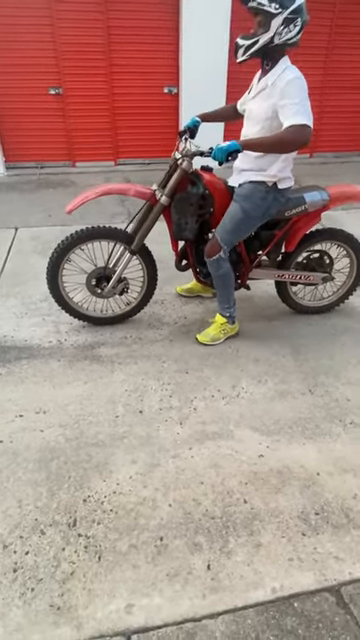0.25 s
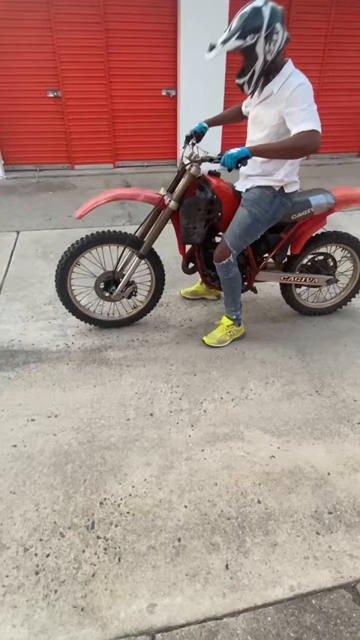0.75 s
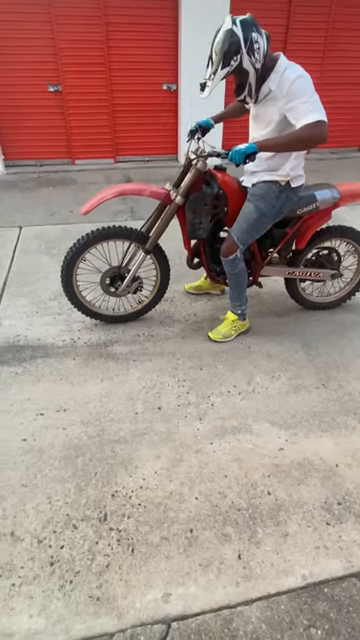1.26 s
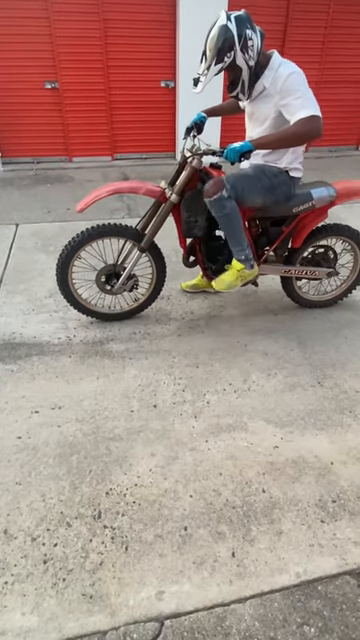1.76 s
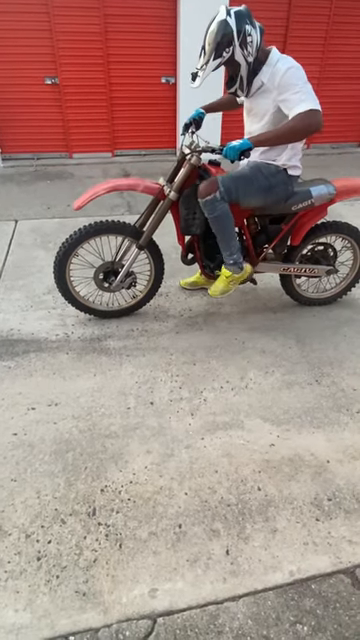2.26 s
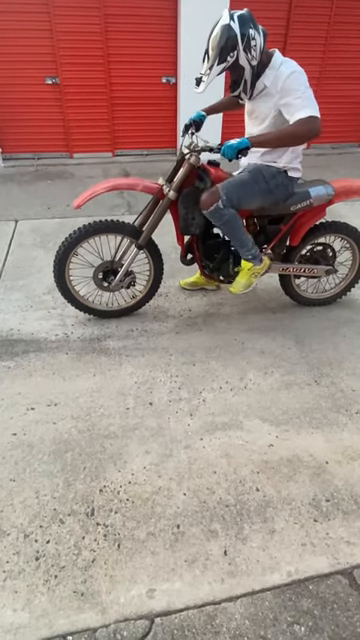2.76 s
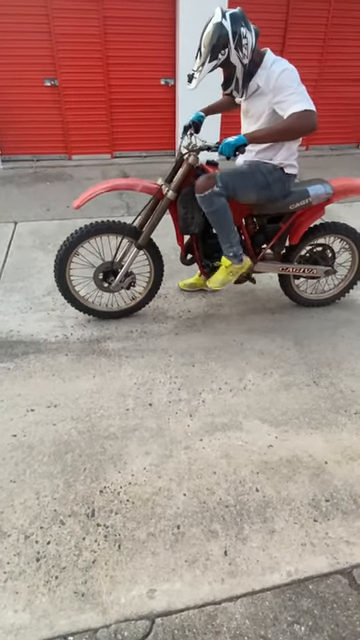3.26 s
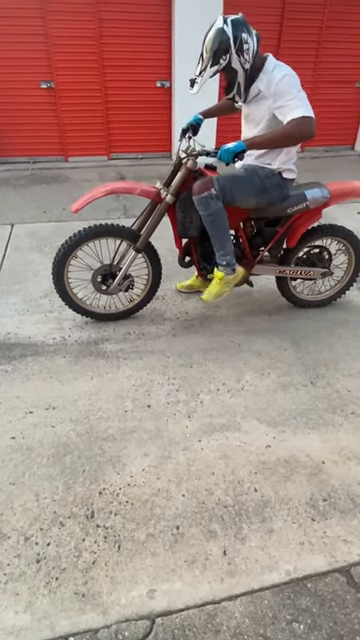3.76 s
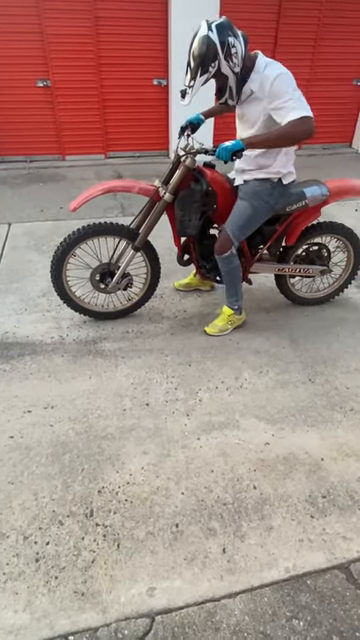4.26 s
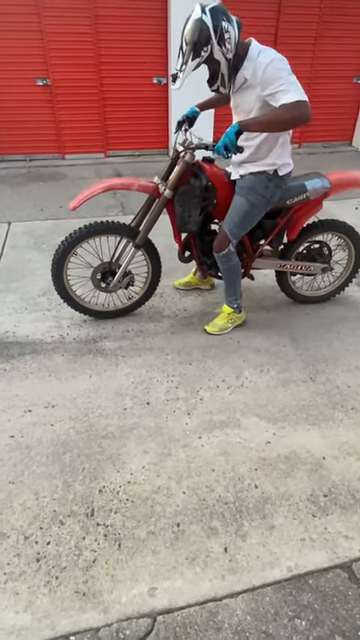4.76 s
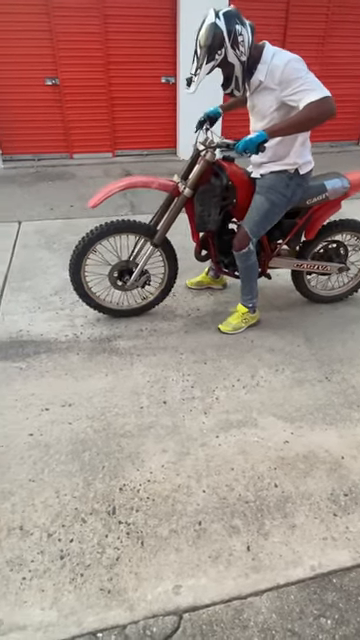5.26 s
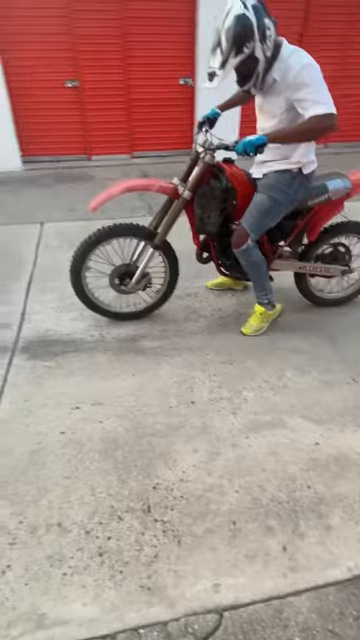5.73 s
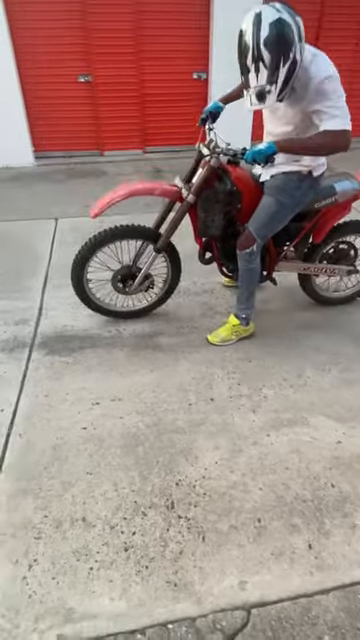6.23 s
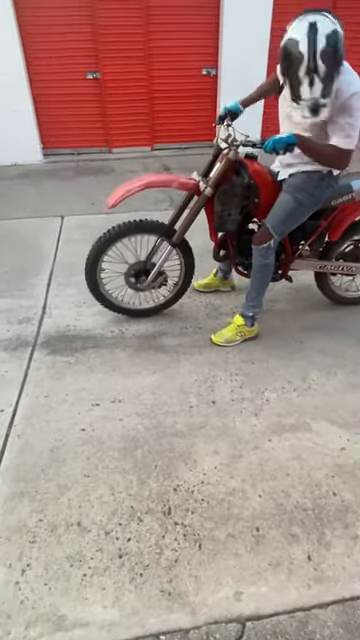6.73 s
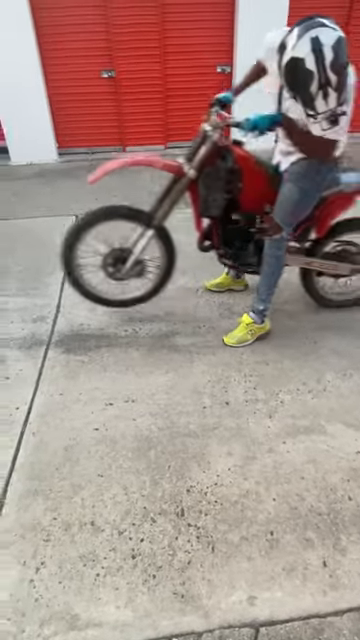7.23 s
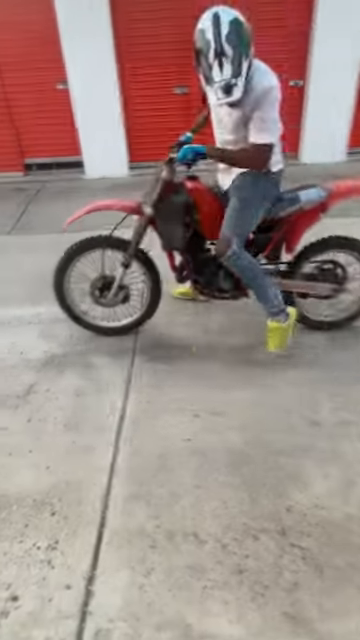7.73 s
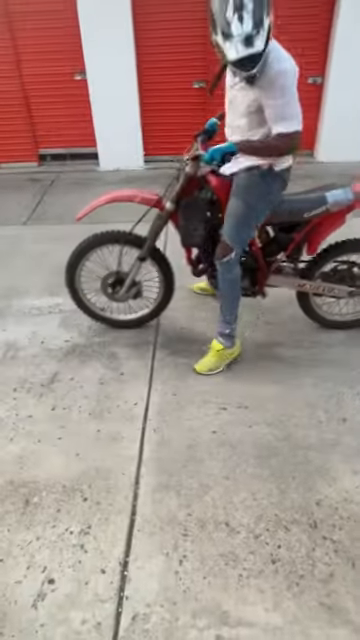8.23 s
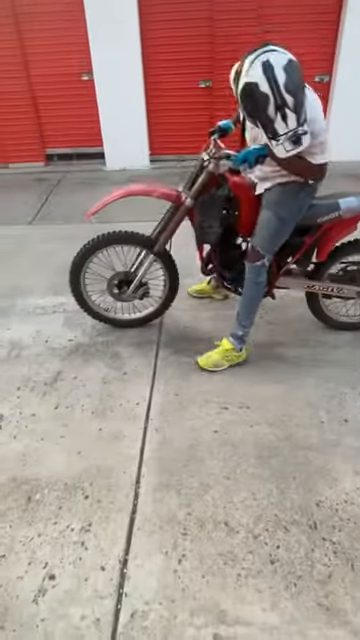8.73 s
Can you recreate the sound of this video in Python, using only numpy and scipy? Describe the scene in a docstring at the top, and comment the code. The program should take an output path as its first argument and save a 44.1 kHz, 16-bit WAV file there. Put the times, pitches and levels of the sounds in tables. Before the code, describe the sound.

Close outdoor stereo sound of a single-cylinder two-stroke bike, never stopping. A loud blip opens, followed by rough double revs, then isolated blips with slowly sagging revs between them. Small stray firings crackle midway. Later the twists come quickly, including a sustained rev pulled down by the clutch, slack chain rattling, and loud final barks. Hard walls return tight slap echoes; faint low rumble lies underneath.

```python
"""Two-stroke dirt bike, blipped in a yard

A dirt bike stands on a concrete lot before steel shutter doors; its throttle is twisted again and again.
Each blip races the crank and sounds the airbox resonances with hard pulses, one a turn.
The crank then coasts down: a sine thumps at crank rate, light pulses ring the pipe, metal rattles once
a turn; rasp and hiss flow nearly steadily, their strength varying from turn to turn.
Stray firings bark, chain clatter comes in bursts of ringing noise, and a low rumble has short thuds."""
import sys
import numpy as np
from scipy import signal
from scipy.fft import rfft, irfft, next_fast_len
from scipy.io import wavfile
from scipy.ndimage import uniform_filter1d

SR = 44100
rng = np.random.default_rng(int(sys.argv[2]) if len(sys.argv) > 2 else 0)


def materialize(psi):
    """Save the field psi as 16-bit PCM at rate SR to the path in sys.argv[1].

    A 1-D psi becomes a single channel; in a 2-D psi each row is a channel.
    """
    bounded = np.clip(np.atleast_2d(psi).T, -1, 1)
    quanta = np.round(bounded * 32767).astype(np.int16)
    wavfile.write(sys.argv[1], SR, quanta)


N = 396459
TIME = np.arange(N) / SR

# Level of the low rumble: start_s, level_db
RUMBLE_LEVEL = [(0.3, -56), (0.5, -51), (2, -52), (3.3, -58), (4.2, -58), (5, -57), (6.1, -61), (7.5, -52),
                (9, -61)]
# Short soft low thuds, most under the loud blips: start_s, length_s, level_db
THUDS = [(0.412, .08, -50), (1.25, .03, -47), (2.548, .04, -45), (5.18, .05, -44), (6.85, .11, -44),
         (7.021, .03, -47), (8.07, .04, -47)]
# Rumble spectrum, relative: freq_hz, density_db_per_hz
RUMBLE_SPECTRUM = [(20, -30), (50, -1), (80, 7.5), (130, 1.5), (400, -15), (2000, -60)]
# Share of noise power common to left and right, by frequency: freq_hz, share_0_to_1
COMMON_SHARE = [(100, 0.88), (1000, 0.61), (2500, 0.56), (3900, 0.32), (5900, 0.44), (6900, 1), (14000, 1)]

# Echoes off doors and walls: delay_s, level_db, left_minus_right_db
ECHOES = [(.021, -13.5, -0.5), (.034, -12, 3.5), (0.063, -13.5, 2.5)]
# Phase difference between left and right, by frequency; sets the stereo width: freq_hz, right_lead_rad
STEREO_PHASE = [(0, 0), (220, 0), (470, 1), (620, 0.8), (850, 1.5), (1050, 0.9), (1240, 1.7), (1420, 0.1),
                (1620, 0.4), (1900, -0.7), (2200, 0.2), (2450, 0.2), (3400, 3.2), (4050, 5.3), (4550, 3.9),
                (5300, 5.95), (5900, 5.3), (6600, 3.2), (8100, 3.1), (9600, 0), (11400, 0), (12500, -3.1),
                (14500, -3.3), (15600, -6.3)]

# Bursts of chain clatter: start_s, length_s, pitch_hz, level_db
CLATTERS = [(7.441, .08, 1117, -30.5), (7.73, 0.039, 1054, -35), (7.801, 0.048, 869, -31),
            (8.0, .05, 800, -21)]
CLATTER_WIDTH_HZ = 95

# Gas noise against crank speed, relative: crank_hz, rasp_db, hiss_db
GAS_BY_SPEED = [(93.7, -43.5, -57), (122, -37, -48.5), (144, -33.5, -45), (190, -32, -42.5)]
# Relative spectra: freq_hz, density_db_per_hz
RASP_SPECTRUM = [(90, -21.5), (220, -5), (400, -4.5), (620, -2.5), (1080, -0.5), (1300, -3), (1550, -2.5),
                 (2250, -4.5), (2750, -3), (3300, -6), (4000, -7), (5000, -8.5), (9000, -68), (16000, -81)]
HISS_SPECTRUM = [(1000, -10), (3000, 21), (4500, 23.5), (6200, 24), (8000, 21), (9500, 18.5), (12000, 16),
                 (14000, 12.5), (16000, -2)]
# Resonances of the pipe's steel shell, relative: freq_hz, width_hz, level_db, left_minus_right_db
SHELL_MODES = [(700, 166, 8, -1.5), (903, 97, 12.5, -2.5), (1105, 134, 10, -3.5), (1325, 117, 6.5, -3),
               (1506, 126, 6, -6), (1730, 80, 5.5, -4), (1980, 79, 2, 5), (2840, 240, 2, -3.5)]
# Resonances of the engine's small metal parts, relative: freq_hz, width_hz, level_db, left_minus_right_db
METAL_MODES = [(2629, 34, 2, -1), (4530, 84, 1, -1.6), (5470, 120, -5.5, -1.1), (6380, 130, -7.5, -0.84),
               (8650, 113, -5.5, 0.2)]
BUZZ_DB = 2.0  # shell ring over the rasp level
CRACKLE_PER_S, CRACKLE_DB = 90, -7  # pops in the pipe; spread of their height relative to a firing
BLAST_POWER, BLAST_LINGER_S = 0.88, 0.0044  # exponent on crank speed; hold beyond the throttle's
FIRE_LAG_S, FIRE_RISE_S, FIRE_FADE_S = 0.017, 0.0091, 0.043  # gas blast follows the throttle
RASP_OVER_HISS_DB, STRAY_HISS_DB = 2.5, -29.5  # in the blast; of stray firings, relative

# Airbox resonances, relative: freq_hz, width_hz, level_db, left_minus_right_db
AIRBOX_MODES = [(139.3, 80, -1, 2), (188, 34, 8.5, 4.7), (347, 60.5, 12.5, 7.3), (449, 99, 9, 4.4),
                (664, 103, 1, 1.5), (833, 210, -11.5, 1.8), (1110, 170, -18, 8)]
# Open airbox, louder where harmonics meet resonances: crank_hz, boom_change_db, bark_change_db
INTAKE_BY_SPEED = [(92, -1, -2.5), (123.5, -1.5, -2.5), (147, -3.5, 4), (146.2, -3, -2), (168.7, 2.5, 1)]
OPEN_S, SHUT_S = 0.064, 0.023  # intake swell; decay once the throttle shuts
HONK_LEAD_S = 0.015  # airbox honks before the engine picks up

# Pipe resonances, relative: freq_hz, width_hz, level_db, left_minus_right_db
PIPE_MODES = [(196, 100, 4, 6.5), (228.6, 42, 8.5, 7.5), (321, 58, 5, 9), (522, 117, 7.5, 2),
              (622, 123, 8.5, 1.5), (794, 41, 1, 8), (900, 36, -4.5, 3)]
# Shut engine, louder where harmonics meet pipe resonances: crank_hz, thump_db, boom_db, bark_db
COAST_BY_SPEED = [(89.9, -65, -39, -31.5), (97.9, -48.5, -31, -34.5), (110, -47, -34, -31),
                  (113.5, -41, -33.5, -31.5), (121.2, -39.5, -31.5, -30), (129.2, -30, -32, -30),
                  (144.2, -31, -28, -30.5), (162, -30, -18, -25.5), (167, -28, -20.5, -27)]
# Level changes over time, some slow, some abrupt: start_s, thump_db, boom_db, bark_db, gas_db
LEVELS = [(0.25, 0, -1, 1, 1), (0.42, 0.5, -0.5, 0.5, -1), (0.6, -3.5, -3, 1, -2), (0.82, 0, -1, 0.5, 0.5),
          (1.2, -2.5, 3, 3, 1), (1.36, 7, -2, 3.5, 1), (1.47, -11, 2.5, 1.5, 1.5),
          (1.62, -3, 1.5, 2.5, 0.5), (1.83, 1, 3, 3.5, 1.5), (1.9, -4, -6.5, -4.5, -1),
          (2.04, -1, 3.5, 1, -1.5), (2.45, 0, 0, -1, -2.5), (2.76, -1, 1.5, 1, 0.5), (3.05, 0.5, 1, 2, 1.5),
          (3.2, -3, 0, -0.5, 0.5), (3.45, 2, 3, 0.5, -0.5), (3.7, 2, 1, 1, -2), (4.1, 0, 4.5, 2, 0.5),
          (4.35, -1, -0.5, 4.5, 2.5), (4.6, -7, -3.5, 1.5, 1.5), (4.95, -0.5, -1.5, -1, 1),
          (5.6, 0.5, 2, 3, -0.5), (5.9, -16, -3.5, 0, -1), (6.12, -3, -2.5, 0, 0), (6.4, -7, 1.5, 4, -1.5),
          (6.8, 4.5, 4.5, 0.5, -1), (7.38, -13.5, -1.5, -1.5, -2.5), (7.58, -1, -7.5, -2.5, -0.5),
          (7.7, -6, -4, -3, -1), (7.93, -15, 2.5, -1, 2), (8.27, 4, -3.5, -2.5, 0),
          (8.48, -10, -8, 0, -2.5)]
WAVER_DB, WAVER_PER_S = 4, 15  # resonances swell and fade as the burn varies; halved for the pipe
SPLIT_HZ = 367  # boom below, bark above

# Throttle twists, levels relative:
# start_s, run_up_s, top_speed_hz, held_open_s, boom_db, bark_db, hiss_db, roughness_0_to_1
BLIPS = [(0.0, 0.12, 172.2, 0.091, -12, -15, -44.5, 0.13), (0.942, 0.14, 142.2, 0.1, -16, -18, -44, 0.9),
         (1.245, 0.088, 162, 0.072, -17, -16.5, -43.5, 0.55),
         (2.545, 0.15, 155, 0.11, -11, -14.5, -38.5, 0.41),
         (3.826, 0.144, 132, 0.089, -14, -16.5, -40.5, 0.06),
         (4.750, 0.13, 122.7, 0.078, -17, -18, -45, 0.61), (5.05, 0.16, 173.6, 0.14, -13, -14, -39.5, 0.23),
         (5.365, 0.135, 159.2, 0.099, -12, -15, -42, 0.24),
         (6.212, 0.16, 147.1, 0.13, -15, -19.5, -40.5, 0.5),
         (6.452, 0.098, 155.9, 0.099, -17.5, -18.5, -41, 0.44),
         (6.675, .19, 177.7, 0.53, -14.5, -17, -43.5, 0.24),
         (7.215, 0.099, 140.4, 0.054, -15, -17, -51, 0.11),
         (7.982, 0.15, 176.4, 0.12, -11, -14.5, -49.5, 0.17),
         (8.515, 0.13, 173.9, 0.41, -15, -19, -40.5, 0.16),
         (8.945, 0.16, 149.6, 0.14, -9, -10.5, -48, 0.29)]
# Stray firings, levels relative: start_s, level_db, length_s, speed_reached_hz
BARKS = [(4.057, -13.5, 0.02, 132.2), (4.189, -16, 0.029, 137), (4.363, -17.5, 0.021, 135.3)]
# Clutch bites and drags the crank down: start_s, length_s, speed_left_hz
CLUTCH = [(5.278, 0.12, 141.2), (6.64, 0.078, 148), (7.024, .204, 115.9), (8.792, 0.2, 110.9)]
BARK_RISE_S, BARK_FADE_S = 0.002, 0.01
START_HZ, KICK_S = 140.84, 0.08  # initial crank speed; time for a stray firing to change it
DRAG_PER_S = 0.213  # friction coefficient at 100 turns a second

CUTOFF_HZ = 15700


def from_db(db):
    """Decibels to gain."""
    return 10 ** (np.asarray(db) / 20)


def panned(db):
    """Left and right gains for a level difference."""
    return from_db(np.array([[db], [-db]]) / 2)


def low_pass(x, hz, order):
    """Butterworth low-pass."""
    return signal.sosfilt(signal.butter(order, hz, fs=SR, output="sos"), x)


def high_pass(x, hz, order=4):
    """Butterworth high-pass: small openings radiate little bass."""
    return signal.sosfilt(signal.butter(order, hz, "high", fs=SR, output="sos"), x)


def delayed(x, delay_s):
    """Same sound, delay_s later."""
    return np.interp(TIME - delay_s, TIME, x, left=0)


def evened(x, size=2205):
    """Holds the running rms of the channels' mean near 1; size in samples."""
    power = uniform_filter1d(uniform_filter1d(x.mean(0) ** 2, size), size // 2)
    return x / np.sqrt(power + 1e-12)


def drift(rate_per_s):
    """Slow random curve, its knots of spread 1."""
    knots = rng.standard_normal(400)
    return np.interp(TIME * rate_per_s % 399, np.arange(400), knots)


def envelope(start_s, attack_s, held_s, release_s):
    """Straight rise and exponential fall; held_s runs from the start."""
    rise = np.clip((TIME - start_s) / attack_s, 0, 1)
    return rise * np.exp(-np.clip((TIME - start_s - held_s) / release_s, 0, 20))


def in_time(rows):
    """Each column of a curve at every sample."""
    start_s, *columns = np.transpose(rows)
    return [np.interp(TIME, start_s, column) for column in columns]


def at_speed(rows, speed_hz):
    """Gains of a table's dB columns at the running crank speed."""
    crank_hz, *columns = np.transpose(rows)
    return [from_db(np.interp(speed_hz, crank_hz, column)) for column in columns]


def noise(spectrum, common_share):
    """Stereo noise of rms 1; the share common to both sides depends on frequency."""
    size = next_fast_len(N, True)
    log_hz = np.log(np.arange(size // 2 + 1) * SR / size + 1)

    def curve(rows):
        freq_hz, values = np.transpose(rows)
        return np.interp(log_hz, np.log(freq_hz), values)

    share = np.clip(curve(common_share), 0, 1)
    shared, *own = rfft(rng.standard_normal((3, size)))
    mixed = np.sqrt(share) * shared + np.sqrt(1 - share) * np.array(own)
    x = irfft(mixed * from_db(curve(spectrum)), size)[:, :N]
    return x / x.std()


def resonate(x, modes, round_hz=4500, waver_db=0):
    """Parallel two-pole resonances, each wavering and panned; a low-pass rounds pressure fronts."""
    x = low_pass(x + 1e-18, min(round_hz, 0.45 * SR), order=2)
    out = np.zeros((2, N))
    for k, (freq_hz, width_hz, level_db, pan_db) in enumerate(modes):
        radius = np.exp(-np.pi * width_hz / SR)
        poles = [1, -2 * radius * np.cos(2 * np.pi * freq_hz / SR), radius ** 2]
        ring = signal.lfilter([1, 0, -1], poles, x) * (1 - radius ** 2) / 2
        gain = from_db(level_db + waver_db * drift(WAVER_PER_S))
        out += (-1) ** k * gain * panned(pan_db) * ring  # signs alternate
    return out


def pulses(turns, rough, spread_db, jitter_s):
    """One pressure pulse a turn; roughness scatters its strength and timing."""
    at = np.interp(np.arange(1, int(turns[-1])), turns, np.arange(N))
    rough_at = (rough * np.ones(N))[at.astype(int)]
    strength, late = rng.standard_normal((len(at), 2)).T * rough_at
    at = np.clip(at + late * jitter_s * SR, 0, N - 2)
    whole, part = at.astype(int), at % 1
    height = from_db(spread_db * np.clip(strength, -2, 2))
    # each pulse is shared between its two nearest samples
    return np.bincount(whole, height * (1 - part), N) + np.bincount(whole + 1, height * part, N)


def puffs(turns, depth, spread_db):
    """Gas flow swells by depth once a turn as the port opens, its strength varying by turn; rms 1."""
    each = from_db(spread_db * rng.standard_normal(2000))[turns.astype(int)]
    flow = each * np.exp(depth * np.cos(2 * np.pi * turns - 1))
    return flow / np.sqrt(np.mean(flow ** 2))


def voiced(x, boom, bark):
    """Evens the deep (boom) and upper (bark) resonances, then sets the gain of each."""
    low = low_pass(x, SPLIT_HZ, order=6)
    high = high_pass(x, SPLIT_HZ, order=6)
    return boom * evened(low, size=1323) + bark * evened(high, size=1323)


def rumble():
    """Wavering low noise, with short soft low thuds, most under the loud blips."""
    level_db, = in_time(RUMBLE_LEVEL)
    thuds = sum(from_db(db) * envelope(s, 0.01, length_s, 0.012) for s, length_s, db in THUDS)
    return (from_db(level_db + 2.2 * drift(25)) + thuds) * noise(RUMBLE_SPECTRUM, COMMON_SHARE)


def yard(x, t60_s, wet_db):
    """Shutter doors and walls return a few echoes and a scattered tail, both dulled."""
    t = TIME[:SR // 2]
    tail = rng.standard_normal((2, len(t))) * from_db(-60 * t / t60_s)
    tail = high_pass(tail / np.sqrt(np.sum(tail ** 2) / 2), hz=338, order=1)
    dull = low_pass(x, 4000, order=1)
    slaps = sum(from_db(db) * panned(pan_db) * delayed(dull.mean(0), delay_s)
                for delay_s, db, pan_db in ECHOES)
    return x + slaps + from_db(wet_db) * signal.fftconvolve(dull, tail, axes=1)[:, :N]


def stereo_phase(x):
    """Phase difference between left and right, by frequency; it sets the stereo width."""
    size = next_fast_len(N + SR // 10, True)
    freq_hz, right_lead_rad = np.transpose(STEREO_PHASE)
    lag_rad = np.interp(np.arange(size // 2 + 1) * SR / size, freq_hz, right_lead_rad)
    left = irfft(rfft(x[0], size) * np.exp(-1j * lag_rad), size)[:N]
    return np.array([left, x[1]])


def clatter():
    """The slack chain rattles as the bike lurches and settles: short bursts of resonant noise."""
    out = 0
    for start_s, length_s, pitch_hz, level_db in CLATTERS:
        ring = resonate(rng.standard_normal(N), [(pitch_hz, CLATTER_WIDTH_HZ, 0, -4)])
        out = out + from_db(level_db) * envelope(start_s, 0.0079, length_s, 0.012) * ring / ring.std()
    return out


def shell_buzz(turns):
    """Uneven pulses and random crackle ring the thin shell of the pipe."""
    beats = pulses(turns, rough=0.3, spread_db=4.5, jitter_s=0.00016)
    pops = (rng.random(N) < CRACKLE_PER_S / SR) * rng.standard_normal(N)
    ring = resonate(beats + pops * from_db(CRACKLE_DB), SHELL_MODES, waver_db=WAVER_DB)
    return from_db(BUZZ_DB) * evened(ring, size=4410)


def metal_rattle(turns):
    """Noise swelling once a turn rings the small metal parts."""
    chatter = rng.standard_normal(N) * puffs(turns, depth=0.7, spread_db=3.5)
    ring = resonate(chatter, METAL_MODES, round_hz=13900, waver_db=WAVER_DB)
    return from_db(-2.5) * evened(ring, size=8820)


def gas(turns, speed_hz, blast):
    """Pipe shell and metal ring; turbulence rasps and hisses nearly steadily; all rise with the blast."""
    rasp_gain, hiss_gain = at_speed(GAS_BY_SPEED, speed_hz)
    blast = blast * (speed_hz / 150) ** BLAST_POWER
    rasp_gain = rasp_gain + from_db(RASP_OVER_HISS_DB) * blast
    hiss_gain = hiss_gain + blast
    ringing = rasp_gain * (shell_buzz(turns) + metal_rattle(turns))
    rasp = noise(RASP_SPECTRUM, COMMON_SHARE) * puffs(turns, depth=0.017, spread_db=1.2)
    hiss = noise(HISS_SPECTRUM, COMMON_SHARE) * puffs(turns, depth=0.033, spread_db=1.04)
    turbulence = from_db(6.0) * rasp_gain * rasp + from_db(11.0) * hiss_gain * hiss
    return ringing + turbulence * panned(db=-0.6)


def intake(turns, boom, bark, rough):
    """Open throttle: hard, uneven pulses and rushing air sound the airbox."""
    flow = puffs(turns, depth=0.16, spread_db=-1)
    rush = from_db(-24.5) * rough * rng.standard_normal(N) * flow
    beats = pulses(turns, rough, spread_db=4.5, jitter_s=0.00026)
    ring = resonate(beats + high_pass(rush, hz=250, order=1), AIRBOX_MODES)
    return voiced(high_pass(ring, hz=107.0), boom, bark)


def exhaust(turns, speed_hz, thump_db, boom_db, bark_db):
    """A round sine thump at crank rate and light pulses that ring the pipe; both waver."""
    thump_gain, boom, bark = at_speed(COAST_BY_SPEED, speed_hz)
    thump = np.sqrt(2) * np.sin(2 * np.pi * turns)
    thump = thump * thump_gain * from_db(thump_db + 2.0 * drift(28))
    beats = pulses(turns, rough=0.13, spread_db=4, jitter_s=0.0001)
    ring = high_pass(resonate(beats, PIPE_MODES, waver_db=WAVER_DB / 2), hz=192.0, order=8)
    boom = boom * from_db(boom_db + 3.2 * drift(14))
    bark = bark * from_db(bark_db + 3.07 * drift(24))
    return thump * panned(db=2.0) + voiced(ring, boom, bark)


def throttle(speed_hz):
    """Boom, bark, gas blast and roughness of the open throttle: blips and stray firings."""
    boom = bark = blast = 0
    for start_s, _, _, held_s, boom_db, bark_db, hiss_db, _ in BLIPS:
        opening = envelope(start_s - HONK_LEAD_S, OPEN_S, held_s + HONK_LEAD_S, SHUT_S)
        boom = boom + from_db(boom_db) * opening
        bark = bark + from_db(bark_db) * opening
        blast_held_s = held_s - FIRE_LAG_S + BLAST_LINGER_S
        firing = envelope(start_s + FIRE_LAG_S, FIRE_RISE_S, blast_held_s, FIRE_FADE_S)
        blast = blast + from_db(hiss_db) * firing
    stray = sum(from_db(db) * envelope(s, BARK_RISE_S, length_s, BARK_FADE_S)
                for s, db, length_s, _ in BARKS)
    # roughness holds from each blip to the next
    latest = np.searchsorted([row[0] - HONK_LEAD_S for row in BLIPS[1:]], TIME)
    rough = np.clip([row[-1] for row in BLIPS], 0, 1)[latest]
    boom_gain, bark_gain = at_speed(INTAKE_BY_SPEED, speed_hz)
    boom = boom * boom_gain + from_db(-2.0) * stray
    bark = bark * bark_gain + stray
    return boom, bark, blast + from_db(STRAY_HISS_DB) * stray, rough


def coasting(from_hz, since_s):
    """Friction slows the free crank, the more the faster it turns."""
    elapsed_s = np.maximum(TIME - since_s, 0)
    return from_hz / (1 + DRAG_PER_S * np.sqrt(from_hz / 100) * elapsed_s) ** 2


def crank_speed():
    """Each blip, stray firing or clutch bite eases the crank to a new speed, from which it coasts."""
    kicks = [(s - KICK_S / 2, KICK_S, reached_hz) for s, _, _, reached_hz in BARKS]
    changes = sorted([tuple(row[:3]) for row in list(BLIPS) + list(CLUTCH) + kicks])
    speed_hz = coasting(START_HZ, 0)
    for start_s, length_s, target_hz in changes:
        u = np.clip((TIME - start_s) / length_s, 0, 1)
        ease = u * u * (3 - 2 * u)
        speed_hz = speed_hz + ease * (coasting(target_hz, start_s + length_s) - speed_hz)
    return speed_hz


def scene():
    """Engine and chain in the yard, over a low rumble."""
    speed_hz = crank_speed()
    turns = np.cumsum(speed_hz * (1 + 0.002 * drift(35))) / SR
    boom, bark, blast, rough = throttle(speed_hz)
    thump_db, boom_db, bark_db, gas_db = in_time(LEVELS)
    note = exhaust(turns, speed_hz, thump_db, boom_db, bark_db) + intake(turns, boom, bark, rough)
    bike = note + from_db(gas_db) * gas(turns, speed_hz, blast) + clatter()
    return stereo_phase(yard(bike, t60_s=0.19, wet_db=-7.5)) + rumble()


def record(dry):
    """Rounds the loudest peaks, then cuts the top steeply."""
    rounded = dry / (1 + dry ** 6) ** (1 / 6)
    return signal.sosfilt(signal.ellip(10, 0.1, 80, CUTOFF_HZ, fs=SR, output="sos"), rounded)


dry = scene()
out = record(dry)
materialize(out)
```